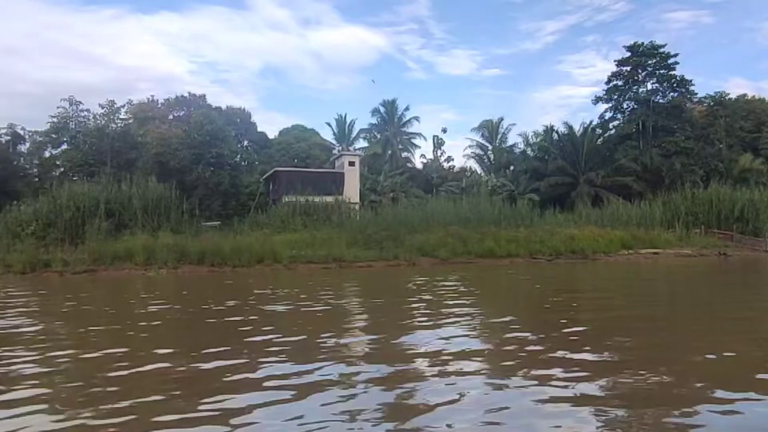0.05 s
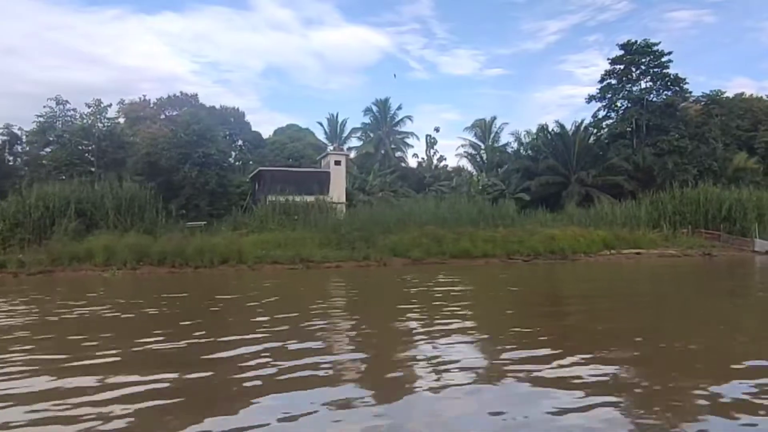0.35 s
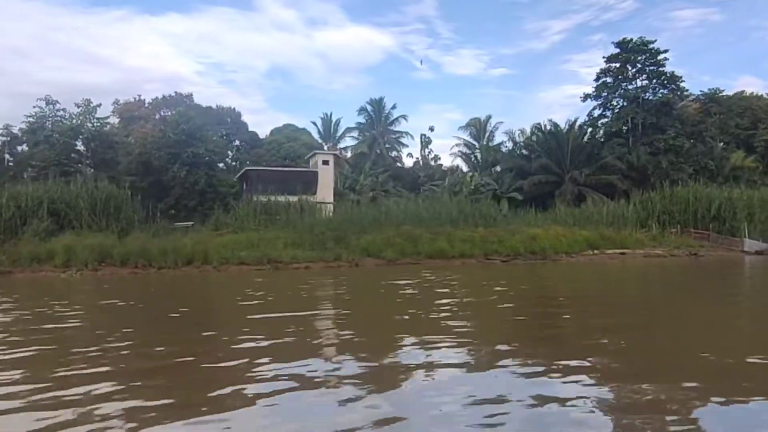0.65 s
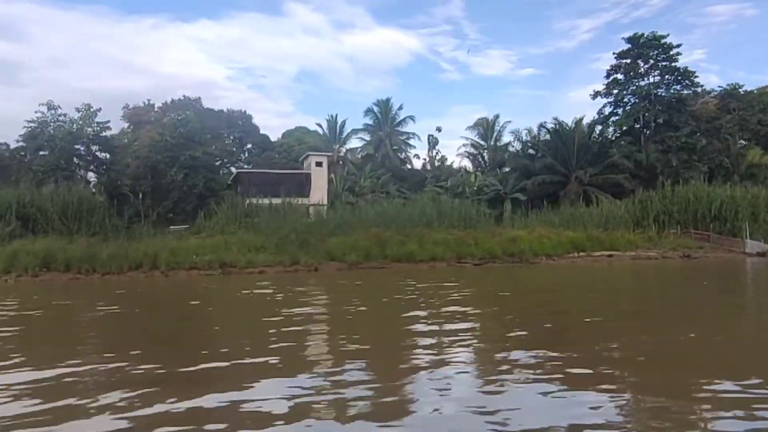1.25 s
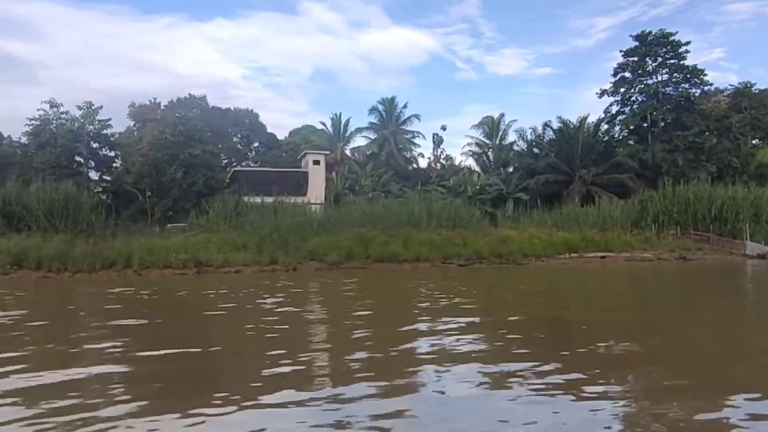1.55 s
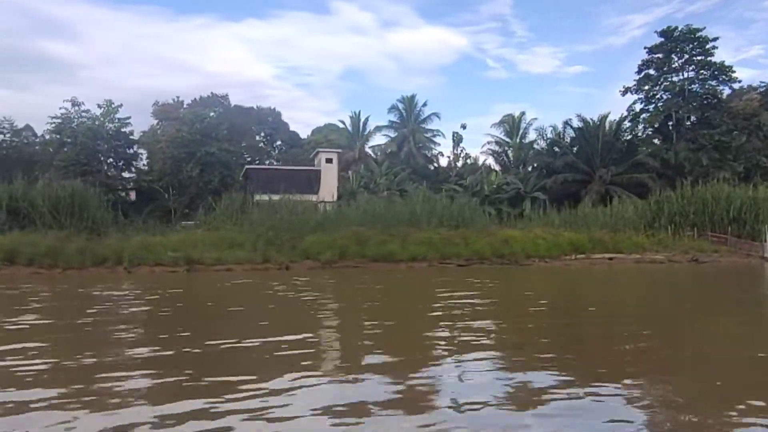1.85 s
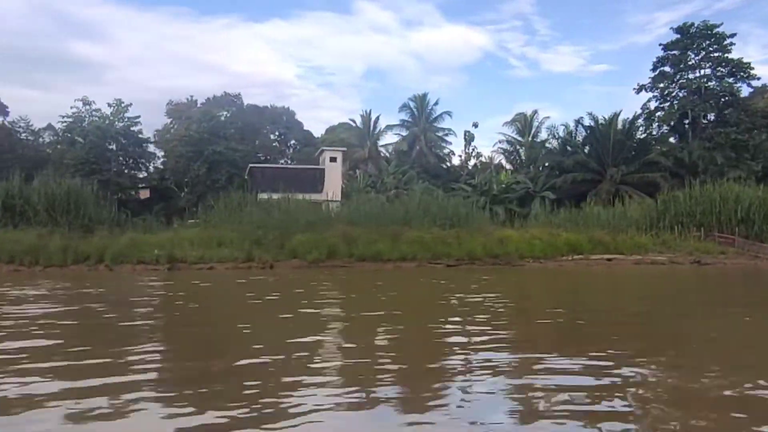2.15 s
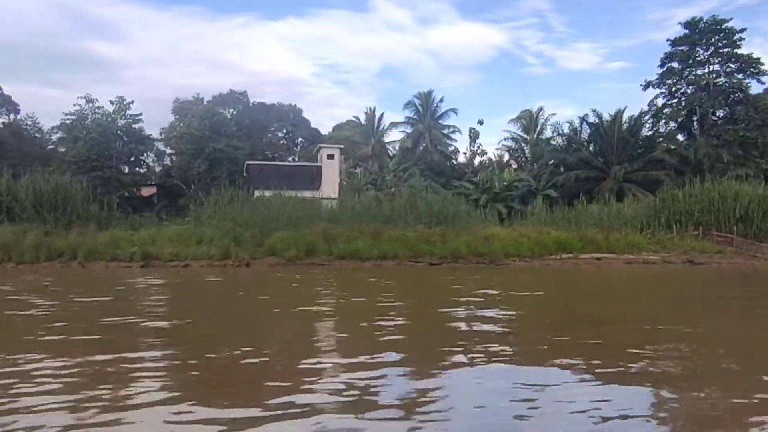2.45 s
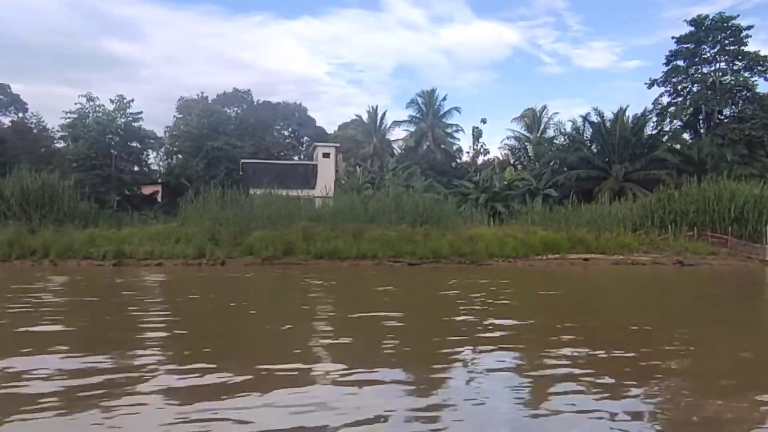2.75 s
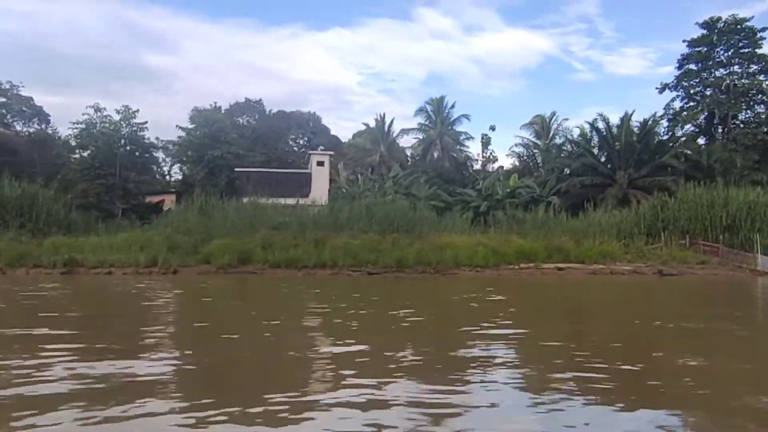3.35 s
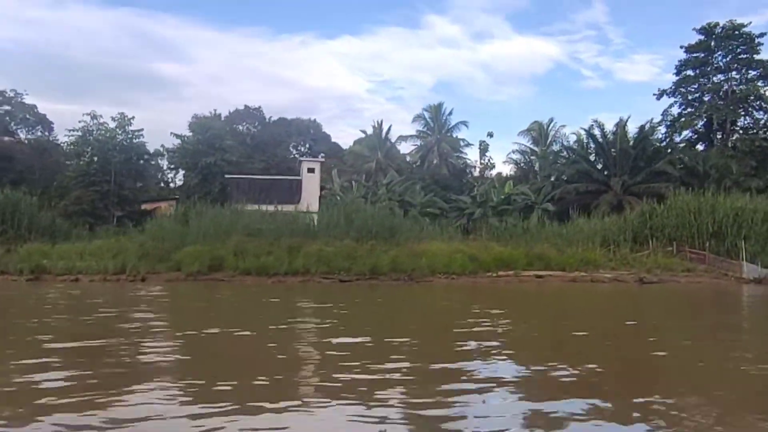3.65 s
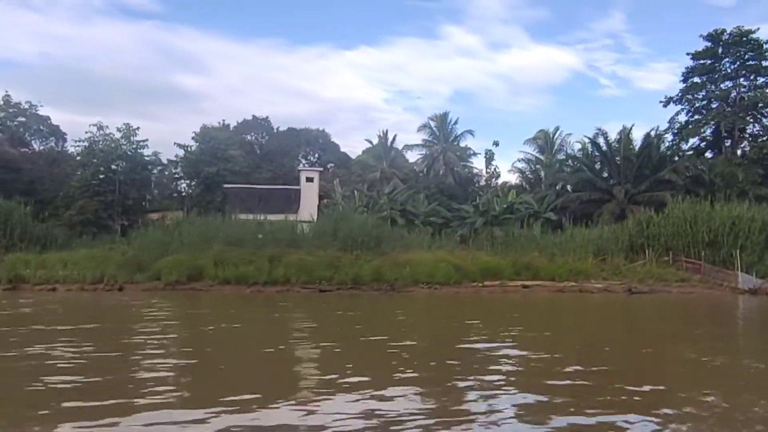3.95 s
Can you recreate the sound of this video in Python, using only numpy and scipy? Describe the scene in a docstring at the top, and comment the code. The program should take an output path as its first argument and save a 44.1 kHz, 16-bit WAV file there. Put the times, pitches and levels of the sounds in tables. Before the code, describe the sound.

A small boat's motor hums at constant cruising speed over light river spray.

```python
"""Outboard motor on a river

From aboard a small boat, the motor drones at cruising speed, firing twice per crankshaft turn.
Its tones and the hum of the propeller sit over exhaust rumble, clatter and the hiss of the bow wave.
Spray splashes now and then, ripples knock on the hull, and a few thin chirps come through."""
import sys
import numpy as np
from scipy import signal
from scipy.fft import rfft, irfft
from scipy.io import wavfile

SR = 44100
rng = np.random.default_rng(int(sys.argv[2]) if len(sys.argv) > 2 else 0)


def wav_out(sig):
    """Save sig, one row per channel (or a flat mono array), as 16-bit PCM at SR to the path in sys.argv[1]."""
    wavfile.write(sys.argv[1], SR, np.round(np.clip(np.atleast_2d(sig).T, -1, 1) * 32767).astype(np.int16))


N = 176400
T = np.arange(N) / SR
RIGHT_DELAY_S = 0.000439  # the right side hears the boat this much later


# Each row: time in seconds, crankshaft turns per second.
CRANK_SPEED = [(.3, 89.93), (.6, 89.8), (1.05, 89.6), (1.25, 89.79), (1.5, 89.58), (1.8, 89.82),
               (2.1, 89.86), (2.6, 90.2), (2.85, 90.08), (3.2, 90.41), (3.5, 90.23), (3.85, 90.3)]

def crankshaft():
    """Counts the turns made so far by the slightly unsteady shaft."""
    return np.cumsum(over_time(CRANK_SPEED)) / SR + 0.0018 * wander(hz=25.9)


# Each row: cycles per turn, level in dB, dB louder on the left, left's head start in radians,
# level drift in dB per second.
ENGINE_TONES = [(1, -35, 1, 0.4, 0), (2, -10, 2, 0.56, 0.28), (3, -27, 1, 1.2, 0), (4, -28.5, 0, 2.43, 0),
                (5, -34.5, 8.5, .65, 0.96), (6, -36.5, 5, 1.51, 1), (7, -33.5, 3, 2.48, 1.7),
                (8, -28, 1, 1.85, -0.15), (9, -48.5, -3, 2.83, .6), (10, -45.5, -4, 2.56, -1.1),
                (11, -48.5, 3, 3.5, -1), (12, -37.5, 4.5, 3.15, 0.5), (13, -40.5, 1.5, 3.38, -1.5),
                (14, -54.5, -3, 3.4, 7), (15, -45.5, -8, 2.8, 0.5), (16, -43.5, 8.5, 3.3, 0.5),
                (17, -49.5, 1, 4.05, 0.3), (18, -42.5, 0.5, 5.23, 2), (19, -55, 3, 5.7, 1.5),
                (20, -57, 1.5, 5, 1.5), (21, -60.5, 3, 6.3, 2.5), (22, -61.5, 3.5, 8.3, 3),
                (30, -54.5, 10.5, 10, 1), (32, -60, 9.5, 8.7, -2.5), (38, -64, 11, 11, -0.5)]
# A few tones swell and sink, listed by cycles per turn. Each row: time in seconds, added dB.
SWELLS = {1: [(.5, 0.5), (1.8, -2.5), (3.2, -0.5), (3.55, 3), (3.9, 3)], 4: [(.4, 1.5), (1.3, 0.5),
          (2.4, -1), (3.2, 0), (3.9, 1)], 6: [(.5, -2.5), (1.2, -2.5), (1.65, 4.5), (2.2, -1), (3.9, -1.5)],
          12: [(.4, -1.5), (1.5, -7), (2.4, 2.5), (3.3, 2.5), (3.9, 1)], 16: [(.4, 5), (1, 3), (2, 1),
          (2.7, -4), (3.4, 3), (3.9, 5.5)]}
# Weak tones of the two-turn firing cycle. Each row: cycles per turn, level in dB.
HALF_TONES = [(1.5, -40), (2.5, -35), (6.5, -46), (7.5, -48.5)]

def engine_drone(turns):
    """Tones locked to the crankshaft. The loudest comes from the two firings in each turn."""
    out = np.zeros((2, N))
    from_middle_s = T - 2.15  # drifts pass through zero mid-scene
    for cycles, db, left_db, lead, drift in ENGINE_TONES:
        swell_db = over_time(SWELLS[cycles]) if cycles in SWELLS else 0
        level_db = db + drift * from_middle_s + swell_db
        waver_db = 1.65 if cycles % 2 else 0.64
        if cycles == 2:  # the firing tone is steadier and drifts toward the centre
            waver_db = 0.37
            left_db -= 0.75 * from_middle_s
        out += tone(cycles * turns, level_db, left_db, lead, waver_db)
    for cycles, db in HALF_TONES:
        lead = 2 * np.pi * cycles * CRANK_SPEED[0][1] * RIGHT_DELAY_S
        out += tone(cycles * turns + .15 * wander(hz=4.6), db, left_db=1.1, lead=lead, waver_db=1)
    return out


# Each row: cycles per propeller turn, level in dB.
PROPELLER_TONES = [(3, -37), (7, -48)]
GEAR_RATIO = 2.068  # crankshaft turns per propeller turn

def propeller(turns):
    """The geared-down shaft hums as its blades beat the water."""
    out = np.zeros((2, N))
    for cycles, db in PROPELLER_TONES:
        cycle_count = cycles * turns / GEAR_RATIO + 0.072 * wander(hz=1.8)
        out += tone(cycle_count, db, left_db=4.2, lead=0.33, waver_db=3.5)
    return out


# Each row: frequency in Hz, relative strength in dB.
RUMBLE_SPECTRUM = [(20, -19), (40, -24.5), (60, -16), (85, -5.5), (140, -1.5), (220, -3), (305, -0.5),
                   (345, -4), (385, -4), (425, -8.5), (500, -8), (650, -14), (730, -11.5), (830, -21.5),
                   (1300, -29), (3000, -58)]
# Each row: time in seconds, level in dB.
RUMBLE_LEVELS = [(.3, -26.5), (.9, -25.5), (1.6, -28.5), (2.8, -27), (3.9, -27)]

def exhaust_rumble(turns):
    """Exhaust and churned water, puffing with each firing."""
    puffs = 1 + 0.31 * np.cos(4 * np.pi * turns)
    low_cut = signal.butter(3, 40, "high", fs=SR, output="sos")
    level_db = over_time(RUMBLE_LEVELS) + 1.2 * wander(hz=19)
    return amp(level_db) * unit(signal.sosfilt(low_cut, noise(RUMBLE_SPECTRUM) * puffs))


# Each row: frequency in Hz, relative strength in dB.
CLATTER_SPECTRUM = [(300, -25), (800, -4), (1120, 0.5), (1250, -2), (1400, -0.5), (1700, -1.5),
                    (1950, -7.5), (2800, -9.5), (3500, -11), (5000, -16.5), (9000, -24), (14000, -48)]
# Each row: time in seconds, level in dB.
CLATTER_LEVELS = [(.3, -40.5), (2, -38.5), (3.9, -37)]

def engine_clatter(turns):
    """Moving parts rattle, pulsing once a turn, twice a turn and once every two turns."""
    angle = 2 * np.pi * turns
    pulse_db = 1.3 * np.cos(angle) + 1.4 * np.cos(2 * angle) + 0.54 * np.cos(angle / 2)
    rattle = noise(CLATTER_SPECTRUM) * amp(pulse_db + 1.4 * wander(hz=50))
    return amp(over_time(CLATTER_LEVELS)) * unit(rattle)


# Each row: frequency in Hz, relative strength in dB.
HISS_SPECTRUM = [(1000, -9.5), (3000, -5.5), (4500, -2.5), (5900, -5), (6650, -2), (7200, -10.5), (8500, 1),
                 (9400, 0.5), (10200, -3), (11250, -13), (11750, -4.5), (12500, -7.5), (13400, -14),
                 (14000, -19.5)]
# Each row: time in seconds, level in dB.
HISS_LEVELS = [(.3, -44.5), (1.2, -44.5), (2.8, -44), (3.4, -44), (3.9, -42.5)]

def bow_wave():
    """The wave at the front of the boat makes a grainy hiss."""
    level_db = over_time(HISS_LEVELS) + .6 * wander(hz=12)
    grainy_hiss = noise(HISS_SPECTRUM) * amp(1.3 * wander(hz=590))
    return amp(level_db) * unit(grainy_hiss)


# Each row: start in seconds, length in seconds, level in dB, centre in Hz, width in octaves.
SPLASHES = [(1.071, 0.07, -41, 7500, 0.37), (1.57, .04, -40, 4200, .25), (2.017, .045, -42.5, 4396, 0.39),
            (3.275, 0.049, -39.5, 6760, 0.43), (3.362, 0.25, -43, 6200, 0.36),
            (3.795, 0.19, -45.5, 5500, .2)]

def spray():
    """Spray splashes in short bursts of high noise."""
    out = np.zeros((2, N))
    for start, length, db, hz, octaves in SPLASHES:
        add(out, start, burst(length, db, hz, octaves))
    return out


# Each row: start in seconds, level in dB, centre in Hz.
KNOCKS = [(0.189, -18.5, 300), (.548, -25, 546), (2.35, -22.5, 258)]

def hull_knocks():
    """Ripples hit the hull with short, low knocks."""
    out = np.zeros((2, N))
    for start, db, hz in KNOCKS:
        add(out, start, burst(0.034, db, hz, octaves=0.8))
    return out


# Each row: start in seconds, length in seconds, level in dB, pitch in Hz.
CHIRPS = [(0.19, 0.019, -43, 6800), (0.186, .02, -42.5, 4700), (0.499, .026, -45, 6700),
          (0.506, .026, -46, 4700), (1.357, .007, -41, 6450), (1.373, 0.016, -35.5, 6600),
          (1.425, .012, -43, 8700), (1.415, 0.024, -45.5, 6100), (1.65, 0.015, -45, 6500),
          (1.877, .022, -48, 4600)]
CHIRP_FALL, CHIRP_ROUGHNESS = 0.055, .04  # fractions of the pitch

def chirps():
    """Very short, slightly rough whistles that fall in pitch."""
    out = np.zeros((2, N))
    for start, length, db, hz in CHIRPS:
        progress = np.arange(0, 1, 1 / (length * SR))
        roughness = CHIRP_ROUGHNESS * wander(hz=900)[:len(progress)]
        pitch = hz * (1 - CHIRP_FALL * (progress - .5) + roughness)
        whistle = np.sqrt(2) * np.sin(2 * np.pi * np.cumsum(pitch) / SR)
        add(out, start, amp(db) * np.sin(np.pi * progress) * whistle)
    return out


# Each row: frequency in Hz, how alike left and right are (held between 0 and 1 when used).
LIKENESS = [(30, -0.7), (90, -0.4), (250, 1.45), (600, 0.12), (1200, 0.12), (2200, .5), (4000, -0.22),
            (12000, 0)]
# Each row: frequency in Hz, dB louder on the left.
BALANCE = [(40, -1), (80, -8), (190, 2), (300, -1.5), (420, -1.5), (600, 3.5), (1500, 1.5), (2700, 1.5),
           (4000, 2.5), (6500, 2.5), (8000, 8.5), (8700, 7), (9500, -2), (13000, 2)]

def noise(spectrum):
    """Stereo noise shaped by a spectrum, partly alike on the two sides."""
    f = np.fft.rfftfreq(N, 1 / SR)
    left, separate = rfft(rng.standard_normal((2, N)))
    alike = np.clip(over_hz(LIKENESS, f), 0, 1)
    delay = np.exp(-2j * np.pi * f * RIGHT_DELAY_S)
    right = (alike * left + np.sqrt(1 - alike ** 2) * separate) * delay
    side_db = over_hz(BALANCE, f) / 2
    pair = np.array([left * amp(side_db), right * amp(-side_db)])
    return unit(irfft(pair * amp(over_hz(spectrum, f)), N))


def tone(cycle_count, db, left_db, lead, waver_db):
    """One stereo tone whose loudness wavers."""
    angle = 2 * np.pi * (cycle_count + rng.random())
    pair = np.array([amp(left_db / 2) * np.cos(angle), amp(-left_db / 2) * np.cos(angle - lead)])
    return np.sqrt(2) * amp(db + waver_db * wander(hz=9.5)) * pair


def burst(length, db, hz, octaves):
    """A band of noise that peaks a quarter of the way through its length, then dies away."""
    age = 4 * np.arange(SR // 2) / SR / length  # 1 at the peak
    f = np.fft.rfftfreq(len(age), 1 / SR) + 1
    band = np.exp(-.5 * (np.log2(f / hz) / octaves) ** 2)
    hiss = irfft(rfft(rng.standard_normal((2, len(age)))) * band)
    return amp(db) * unit(hiss) * age * np.exp(1 - age)


def wander(hz):
    """A random wobble of typical size 1, up to about the given rate."""
    f = np.fft.rfftfreq(N, 1 / SR)
    return unit(irfft(rfft(rng.standard_normal(N)) * (f > 0) / (1 + (f / hz) ** 4), N))


def amp(db):
    """Turns decibels into a gain."""
    return 10 ** (np.asarray(db) / 20)


def unit(x):
    """Scales a signal to an average power of 1."""
    return x / np.sqrt(np.mean(x ** 2) + 1e-20)


def over_time(points):
    """Joins points in time with straight lines."""
    return np.interp(T, *np.transpose(points))


def over_hz(points, hz):
    """Joins the points of a spectrum, with octaves evenly spaced."""
    f, value = np.transpose(points)
    return np.interp(np.log(hz + 1), np.log(f), value)


def add(mix, start, sound):
    """Mixes a stereo sound in at a start time in seconds."""
    part = mix[:, max(round(start * SR), 0):][:, :sound.shape[-1]]
    part += sound[..., :part.shape[1]]


def scene():
    """One crankshaft drives all the motor sounds; the water and chirps join them."""
    turns = crankshaft()
    motor = engine_drone(turns) + propeller(turns) + exhaust_rumble(turns) + engine_clatter(turns)
    return motor + bow_wave() + spray() + hull_knocks() + chirps()


START_S, RISE_S, START_DB, TREBLE_LIMIT_HZ = .119, 0.2, -8.5, 14150

def record(dry):
    """After a brief silence the sound cuts in and rises to full level, with its top treble removed."""
    switch_on = np.clip((T - START_S) * 1000, 0, 1)
    rise = amp(START_DB * np.clip(1 - (T - START_S) / RISE_S, 0, 1))
    lowpass = signal.firwin(511, TREBLE_LIMIT_HZ, window=("kaiser", 9), fs=SR)
    return signal.oaconvolve(dry * switch_on * rise, lowpass[None], "same")


dry = scene()
out = record(dry)
wav_out(out)
```